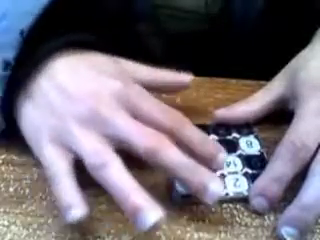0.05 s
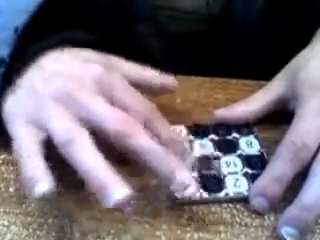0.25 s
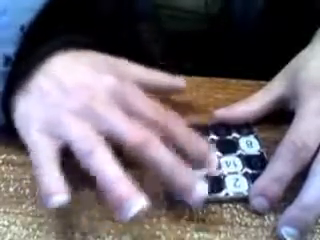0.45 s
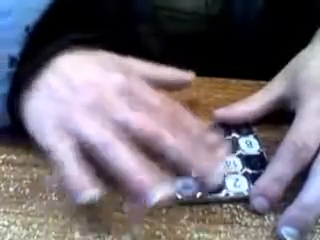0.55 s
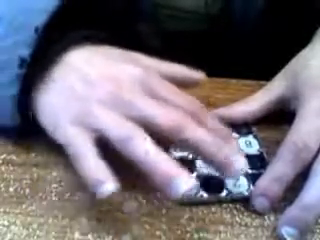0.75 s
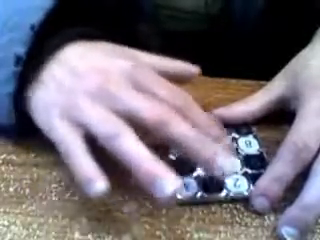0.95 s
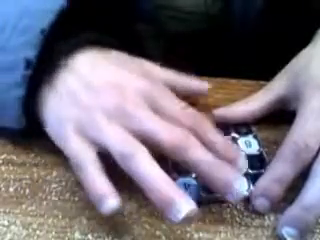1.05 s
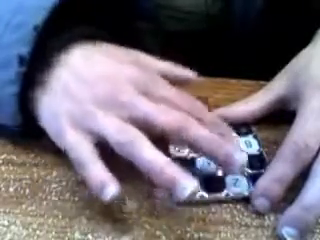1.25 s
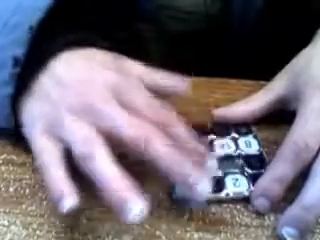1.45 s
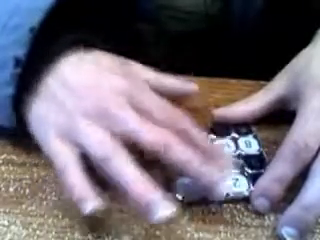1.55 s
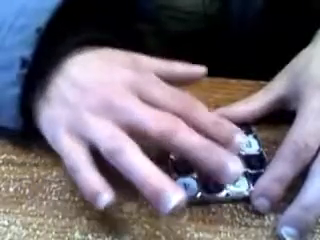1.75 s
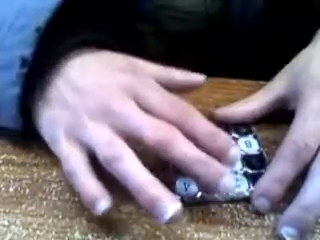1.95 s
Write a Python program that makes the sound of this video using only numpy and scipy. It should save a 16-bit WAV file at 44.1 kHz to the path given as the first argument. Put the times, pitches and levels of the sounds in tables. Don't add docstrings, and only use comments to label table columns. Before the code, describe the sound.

Hard plastic sliding-puzzle tiles clack on a wooden table, close and dry. Faint finger rubbing leads to sharp clacks with short scrapes at 0.25 and 0.3 seconds, then a strong pair near 0.6. Light ticks follow; a boomy table thump comes with a clack around 1.0. More clacks hit at 1.3 to 1.4, then a rapid clatter from 1.6 to 1.75. Low hum and hiss, little bass or treble.

```python
import sys
import numpy as np
from scipy import signal
from scipy.fft import rfft, irfft
from scipy.io import wavfile
from scipy.ndimage import uniform_filter1d

SR = 44100
rng = np.random.default_rng(int(sys.argv[2]) if len(sys.argv) > 2 else 0)


def attenuation_scalar(level_db):
    decades = np.asarray(level_db, float) / 20
    return 10 ** decades


def bounce(signal):
    frames = np.transpose(np.atleast_2d(signal))
    limited = np.clip(frames, -1, 1)
    pcm = np.round(limited * 32767).astype(np.int16)
    wavfile.write(sys.argv[1], SR, pcm)


N = 88200

# frequency in Hz, level in dB, t60 in s.
TRAY_MODES = [(1099, 2, 0.014), (1270, -6, .012), (1459, 3.5, 0.016)]
TILE_MODES = [(2443, -3, 0.008), (2786, -4, 0.0077), (3479, 3, 0.0099), (3983, 2, 0.0093),
              (4678, 2, 0.0096), (5170, 3, 0.0062)]
EDGE_MODES = [(6005, -3.5, .009), (6300, -9, 0.0098), (6954, 0, 0.0062), (7560, -9, 0.0075)]


def evened(x):
    return x / np.sqrt(np.mean(x ** 2) + 1e-20)


def read(points, hz):
    f, value = np.transpose(points)
    return np.interp(np.log(hz + 1), np.log(f + 1), value)


def line(points):
    return np.interp(np.arange(N) / SR, *np.transpose(points))


def add(mix, s, sound):
    part = mix[round(s * SR):][:len(sound)]
    part += sound[:len(part)]


def colour(x, points):
    gain = attenuation_scalar(read(points, np.fft.rfftfreq(2 * N, 1 / SR)))
    return irfft(rfft(x, 2 * N) * gain)[:N]


def ring(modes, detune=0, size=2600, phase=0):
    t = np.arange(size) / SR
    hz, db, t60 = np.transpose(modes)[:, :, None]
    shift = np.broadcast_to(detune, 6)[:len(modes), None]
    start = np.broadcast_to(phase, 6)[:len(modes), None]
    decay = attenuation_scalar(db - 60 * t / t60)
    h = (decay * np.sin(2 * np.pi * (hz * (1 + shift) * t + start))).sum(0)
    return h / abs(h).max()


def favour_db(hz, favoured_hz):
    def far_db(f):
        octaves = np.log2(f / favoured_hz)
        return np.minimum(8 * (octaves / 0.24) ** 2, 24)
    nearest_db = np.min([far_db(mode[0]) for mode in TILE_MODES], axis=0)
    return (nearest_db - far_db(hz)) * (hz > 3000)


def clacks():
    # start in seconds, peak in dB, tray share in dB, edge share in dB, favoured mode in Hz.
    hard_hits = [(0.2323, -7, -19, 2.5, 3900), (0.2401, -3, -14.5, -8.5, 3500),
                 (.2478, -19.5, -17, -6, 3500), (0.2564, -14.5, -11.5, 0, 3700),
                 (0.3118, -2, -22, -10, 3550), (0.313, -13.5, 4.5, -12, 3600),
                 (0.5616, -15, -6.5, -2, 4000), (0.5637, -8, 1, -4.5, 4200),
                 (0.5792, -13.5, -14, -12.5, 3950), (0.6011, 1, -12, -9.5, 3850),
                 (0.6023, -7.5, -14, -1.5, 3800), (0.9791, -27, -2.5, -12, 4200),
                 (0.9916, -11.5, -6, -3.5, 4300), (0.9941, -13.5, -11.5, -1, 4700),
                 (1.0698, -19, -17, -5.5, 3460), (1.0766, -28.5, -16.5, -15, 4040),
                 (1.2816, -15.5, -1, -4.5, 5100), (1.3417, -14.5, 3, 2, 3800),
                 (1.344, -23.5, -15.5, -8, 3700), (1.3622, -1, -4.5, -8, 4200),
                 (1.3698, -6, -9.5, -5.5, 4300), (1.618, -19.5, -3, 1.5, 4800),
                 (1.621, -16.5, 2.5, 4, 4700), (1.6606, -6.5, -7, -4.5, 4200),
                 (1.662, -9.5, -3, -6.5, 4200), (1.6673, -14, -8, -6, 4400),
                 (1.6705, -14.5, -11, -7.5, 4700), (1.694, -15, -16, -7.5, 3900),
                 (1.7133, -8.5, -11, -9.5, 3900), (1.7166, -9.5, -16, -9, 4000),
                 (1.7197, -8, -8.5, -10.5, 4000), (1.735, -7.5, -2.5, 1.5, 4500)]
    light_ticks = [(.02, -37.5, -22, -15, 4000), (0.322, -28, -7, -15.5, 3400),
                   (.407, -40.5, -17, -6, 4900), (0.5193, -44, -19.5, -19, 3800),
                   (0.62, -29, -21, -1, 3950), (.63, -36, -27, -2, 3500), (0.692, -42.5, -9.5, -4, 4600),
                   (0.697, -35.5, -2, -1, 4000), (0.8185, -41.5, -28, -30, 3600),
                   (0.876, -39, -14, 3, 4500), (.9, -43, -14, 2, 4500), (1.208, -37, -9, -8, 5000),
                   (1.218, -46, -12, -2, 5000), (1.266, -39.5, -11, 0, 3700),
                   (1.273, -43.5, -11, -1.5, 3500), (1.627, -28.5, -4, -9, 4800),
                   (1.782, -33.5, -13, -13, 4000)]
    out, t = np.zeros(N), np.arange(2600) / SR
    for s, db, tray_db, edge_db, favoured_hz in hard_hits + light_ticks:
        touch_s = 0.0006 if db > -27 else 0.0015
        detune = 0.014 * rng.standard_normal((3, 6))
        phase = np.arange(6) / 2 + 0.12 * rng.standard_normal((3, 6))
        tile = [(hz, mode_db + favour_db(hz, favoured_hz), t60) for hz, mode_db, t60 in TILE_MODES]
        hit = ring(tile, detune[0], phase=phase[0])
        hit += attenuation_scalar(tray_db) * ring(TRAY_MODES, detune[1], phase=phase[1])
        hit += attenuation_scalar(edge_db) * ring(EDGE_MODES, detune[2], phase=phase[2])
        hit += rng.standard_normal(2600) * attenuation_scalar(-8.5 - 60 * t / 0.014)
        hit *= 1 - np.exp(-(t / touch_s) ** 2)
        add(out, s - touch_s, attenuation_scalar(db) * hit / abs(hit).max())
    return out


def slides():
    # start in seconds,
    # length in seconds, first level in dB, last level in dB, tray share in dB.
    strokes = [(0.2192, 0.0115, -49, -23, -20), (0.229, .029, -19, -21.5, -4),
               (0.302, 0.01, -80, -14.5, -9), (0.556, 0.0054, -41, -19.5, -4.5),
               (0.561, 0.019, -23.5, -20.5, -5.5), (0.579, .021, -20.5, -20.5, -11.5),
               (0.689, 0.013, -45.5, -42, -2.5), (0.854, 0.069, -64, -53.5, -4),
               (0.987, 0.0065, -48, -21.5, -20), (.994, 0.0054, -32.5, -42, -13),
               (1.063, 0.011, -47, -38.5, -35.5), (1.073, 0.013, -47, -58, -20.5),
               (1.289, .017, -40.5, -41, 3.5), (1.336, 0.011, -39.5, -37.5, -3),
               (1.347, 0.012, -42, -37, 3), (1.361, 0.0055, -19.5, -25.5, -2.5),
               (1.366, 0.014, -27, -31, -8), (1.613, 0.011, -29, -28, -8.5),
               (1.65, 0.021, -30.5, -29.5, -15.5), (1.6584, 0.0067, -17, -46.5, -10.5),
               (1.665, 0.01, -17.5, -28, -10), (1.673, 0.034, -35.5, -30.5, -2.5),
               (1.704, .021, -26, -24, -13.5), (1.725, 0.014, -32.5, -28, 0.5),
               (0.256, 0.022, -34, -40, -10.5),
        (0.276, 0.018, -47, -56.5, -0.5),
        (0.316, 0.016, -38.5, -57, -11.5),
        (.601, .008, -24.5, -34.5, -7),
        (0.608, 0.03, -39, -47, -8.5),
        (0.635, 0.018, -57, -60.5, -19.5),
        (0.978, 0.031, -52.5, -50.5, 10),
        (1.378, 0.012, -48, -53.5, -11),
        (1.628, 0.031, -47.5, -47.5, -10.5),
        (1.72, 0.0096, -62.5, -67, 14),
    ]
    # time in seconds, favoured mode in Hz.
    pressed_at = [(.22, 3970), (.26, 3580), (.56, 3860), (.6, 3800), (.69, 4430), (.99, 4400), (1.3, 4130),
                  (1.37, 3990), (1.62, 4750), (1.67, 4200), (1.72, 4000)]
    grains_per_s, grain_db, ease_s = 14000, 1.5, 0.0015
    grains = (rng.random((2, N)) < grains_per_s / SR) * rng.standard_normal((2, N))
    grains *= attenuation_scalar(grain_db * np.minimum(rng.exponential(1, (2, N)), 3))
    press = np.zeros((2, N))
    for s, length, first_db, last_db, tray_db in strokes:
        u = np.linspace(0, 1, round(length * SR))
        stroke = attenuation_scalar(first_db + (last_db - first_db) * u) * np.minimum(u * length / ease_s, 1)
        add(press[0], s, stroke)
        add(press[1], s, stroke * attenuation_scalar(tray_db))
    on_tile, on_tray = evened(grains) * press
    tray = ring(TRAY_MODES)
    edge = attenuation_scalar(-4.5) * ring(EDGE_MODES)
    edge[0] += 0.8
    out = signal.oaconvolve(on_tray, tray / np.linalg.norm(tray)) + signal.oaconvolve(on_tile, edge / 5.2)
    favoured_hz = line(pressed_at)
    for k, mode in enumerate(TILE_MODES):
        push = on_tile * attenuation_scalar(mode[1] + 0.41 * favour_db(mode[0], favoured_hz))
        out += (-1) ** k * signal.oaconvolve(push, ring([mode]) / 7.3)
    return out[:N]


def thumps():
    # start in seconds, boom in dB, low knock in dB, high knock in dB.
    pushes = [(.242, -38.5, -16, -22.5), (.248, -44, -21.5, -25.5), (0.254, -44.5, -24.5, -30),
              (0.312, -43.5, -37, -26.5), (0.605, -37, -23.5, -42), (0.695, -48, -37.5, -51),
              (0.965, -16, -46, -39), (0.9673, -28.5, -46.5, -46.5), (0.978, -18, -43, -46),
              (0.9924, -7.5, -31.5, -18.5), (.998, -19, -42.5, -23.5), (1.002, -14, -38.5, -35),
              (1.069, -21, -52, -46), (1.285, -45.5, -31, -40), (1.619, -48, -21, -27.5),
              (1.698, -28.5, -28.5, -40)]
    # frequency in Hz, level in dB, t60 in s.
    boom = [(200, -5.5, 0.083), (243, 4.5, 0.11), (338, -5, .04)]
    low_knock = [(483, -6, 0.057), (517, 2, 0.042)]
    high_knock = [(770, -3.9, 0.039), (930, 0.89, 0.063)]
    parts = ((boom, 130), (low_knock, 60), (high_knock, 28))
    out = np.zeros(N)
    for s, *levels_db in pushes:
        for db, (modes, push_size) in zip(levels_db, parts):
            table = ring(modes, 0.039 * rng.standard_normal(6), size=4000)
            hit = np.convolve(np.hanning(push_size), table)
            add(out, s, attenuation_scalar(db) * hit / abs(hit).max())
    return out


def skin():
    # time in seconds, rubbing level in dB.
    rub_level = [(0, -53), (.06, -59), (.1, -67), (.18, -52.5), (.3, -57.5), (.4, -72), (.66, -68),
                 (.8, -69), (.97, -60), (1.1, -73), (1.32, -57.5), (1.45, -64), (1.8, -71.5), (2, -67.5)]
    # frequency in Hz, rubbing spectrum in dB.
    rub_colour = [(300, -16.5), (1200, -19), (3800, -5.5), (6500, -12), (7600, -24), (8700, -36),
                  (9600, -70)]
    # start in seconds, length in seconds, first pitch in Hz, last pitch in Hz, level in dB.
    squeaks = [
        (0.031, .012, 6460, 6400, -61.5),
        (0.043, .022, 3900, 3600, -58),
        (0.14, .018, 3570, 4080, -60),
        (.155, .022, 3230, 3910, -57),
        (0.172, .022, 4650, 5730, -58),
    ]
    unevenness = evened(uniform_filter1d(rng.standard_normal(N), size=200))
    fizz = rng.standard_normal(N) * attenuation_scalar(2 * unevenness)
    out = evened(colour(fizz, rub_colour)) * attenuation_scalar(line(rub_level))
    for s, length, first_hz, last_hz, db in squeaks:
        u = np.linspace(0, 1, round(length * SR))
        wobble = 1 + 0.014 * evened(uniform_filter1d(rng.standard_normal(1400), size=60))[:len(u)]
        hz = (first_hz + (last_hz - first_hz) * u) * wobble
        tone = np.sin(2 * np.pi * np.cumsum(hz) / SR)
        add(out, s, attenuation_scalar(db + 5.5) * np.sin(np.pi * u) * tone)
    return out


def room(x):
    t60_s, level_db = 0.054, -27
    t = np.arange(6000) / SR
    tail = rng.standard_normal(6000) * attenuation_scalar(-60 * t / t60_s) * (t > 0.003)
    return attenuation_scalar(level_db) * signal.oaconvolve(x, tail / np.linalg.norm(tail))[:N]


def floor():
    # frequency in Hz, background spectrum in dB per Hz.
    hum_and_hiss = [(35, -83), (60, -51), (132, -5), (176, 2.5), (794, -14), (1200, -10.5), (4600, -23.5),
                    (6950, -44.5), (8370, -74.5), (10900, -79.5), (18400, -120)]
    # frequency in Hz, gain in dB.
    bass_cut = [(60, -61.5), (98, -35.5), (125, -3.5)]
    # time in seconds, background swell in dB.
    swell = [(0, 5), (.64, -1.5), (.8, 0), (1.1, 4.5), (2, 4.5)]
    noise = colour(colour(rng.standard_normal(N), hum_and_hiss), bass_cut)
    return evened(noise) * attenuation_scalar(-57.5 + line(swell))


def scene():
    # frequency in Hz,
    # gain in dB.
    plastic_low = [(300, -45), (780, -12.5), (1000, -1.5), (1600, 0.5), (1950, -2), (2300, 0.5)]
    # frequency in Hz, gain in dB.
    mic = [(30, -32.5), (95, -27), (140, -10), (7000, 2), (7800, -12), (8900, -17), (9600, -31),
           (15000, -39.5), (16500, -81.5)]
    puzzle = colour(clacks() + slides(), plastic_low)
    close = colour(puzzle + room(puzzle) + thumps(), mic)
    return (close + skin() + floor())[None]


def roll_off(x):
    return signal.sosfilt(signal.butter(12, 16800, fs=SR, output="sos"), x)


def record(dry):
    mix = dry * min(1, 0.96 / abs(dry).max())
    return roll_off(mix)


dry = scene()
out = record(dry)
bounce(out)
```